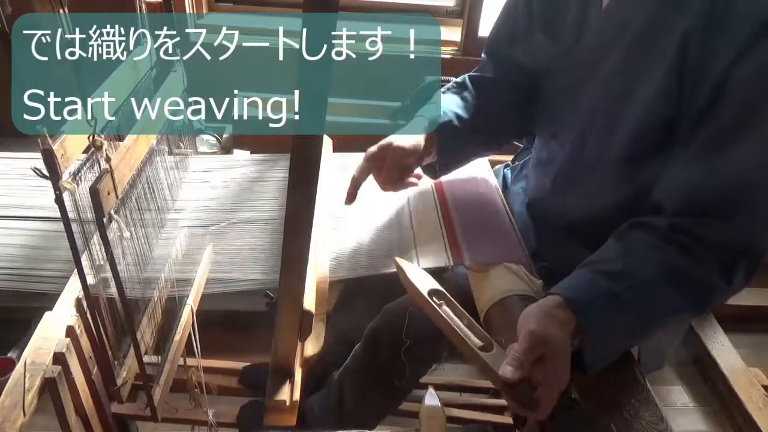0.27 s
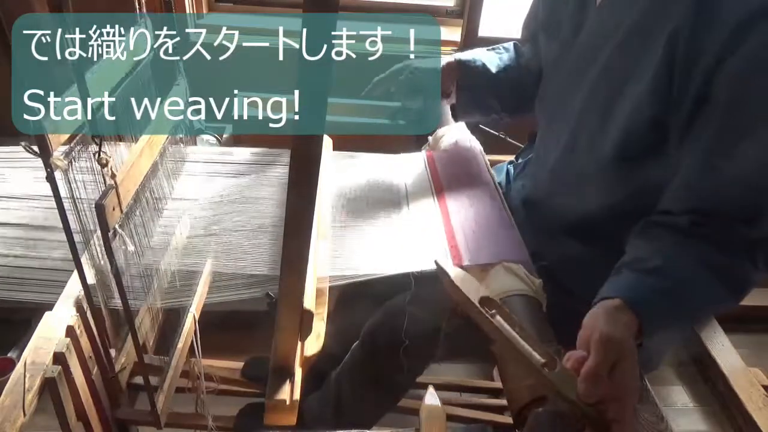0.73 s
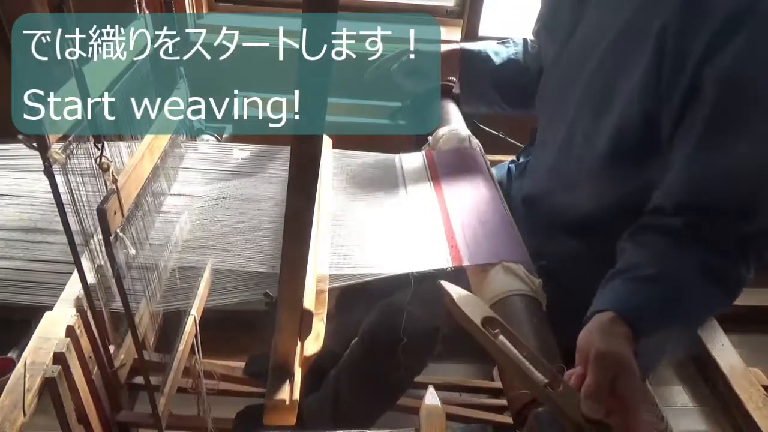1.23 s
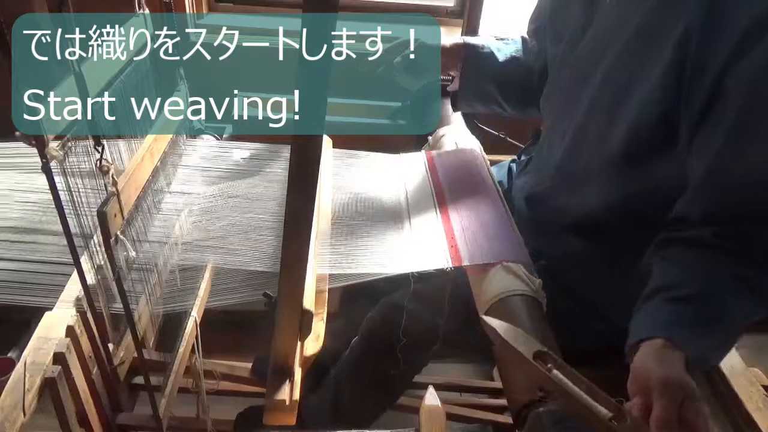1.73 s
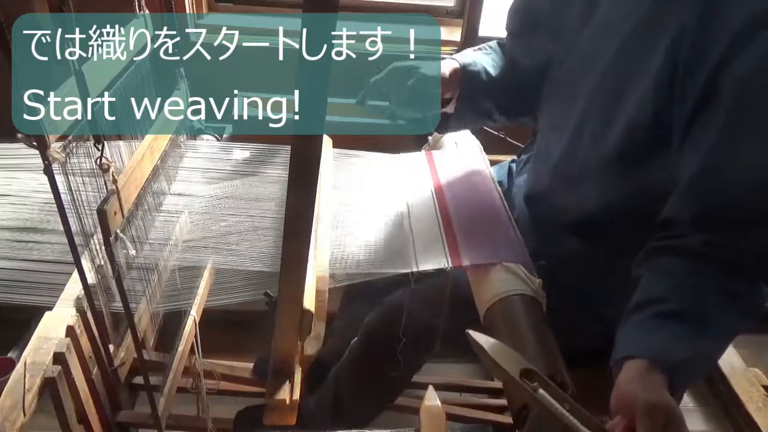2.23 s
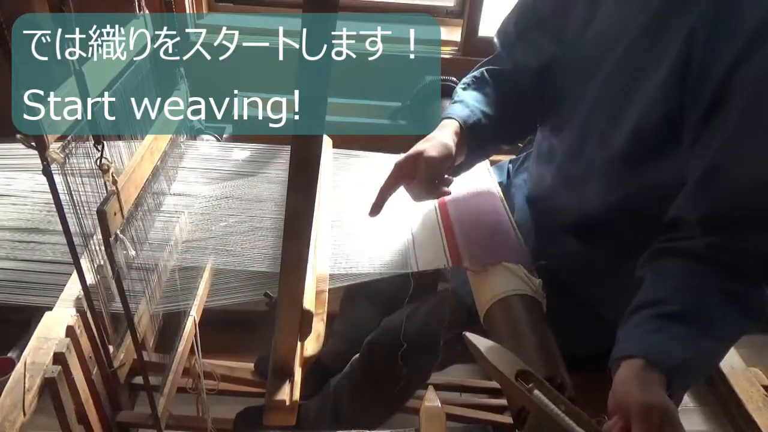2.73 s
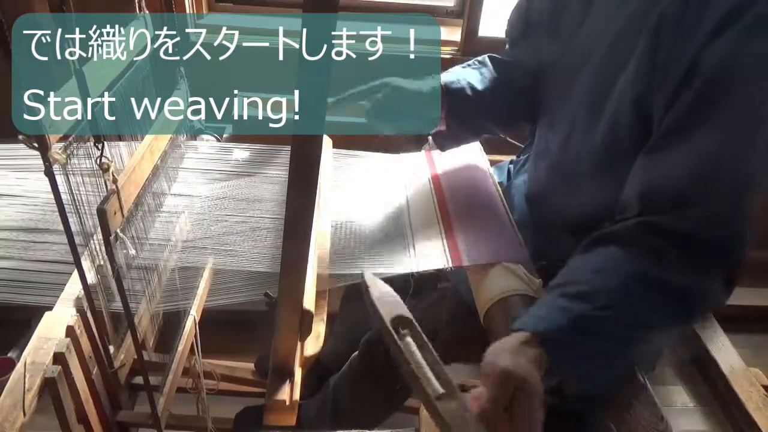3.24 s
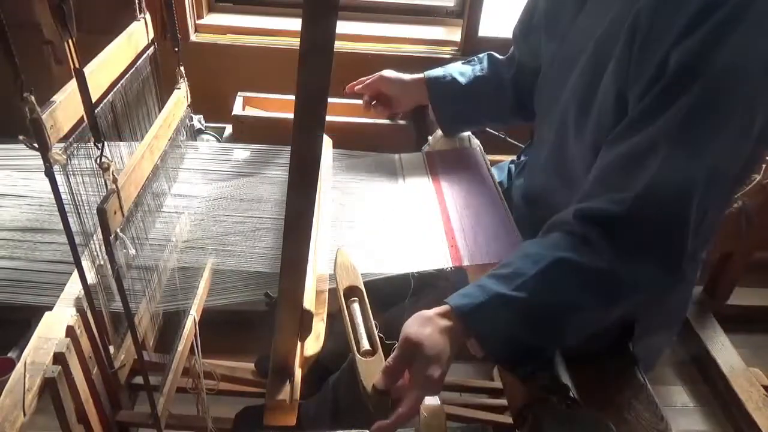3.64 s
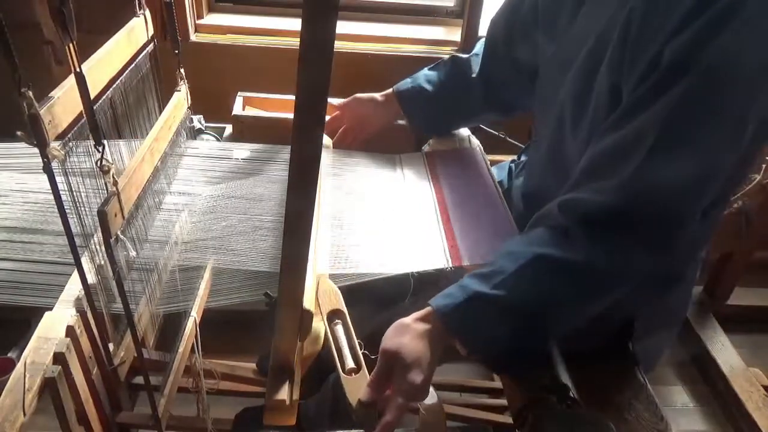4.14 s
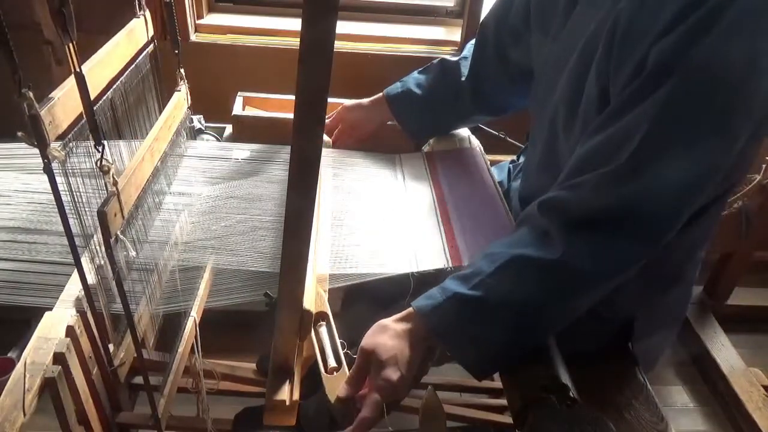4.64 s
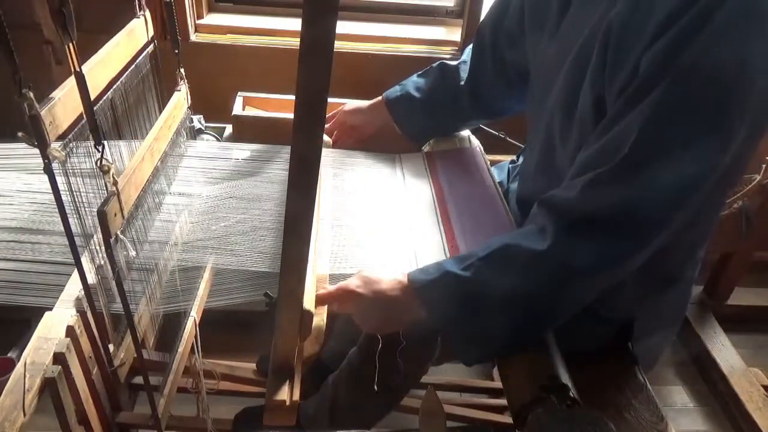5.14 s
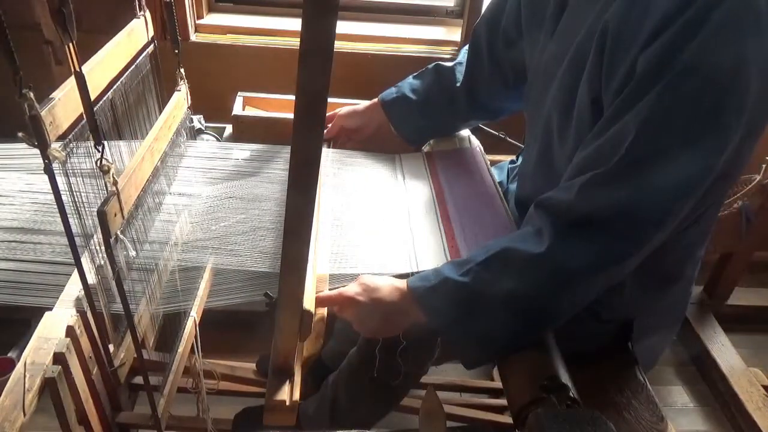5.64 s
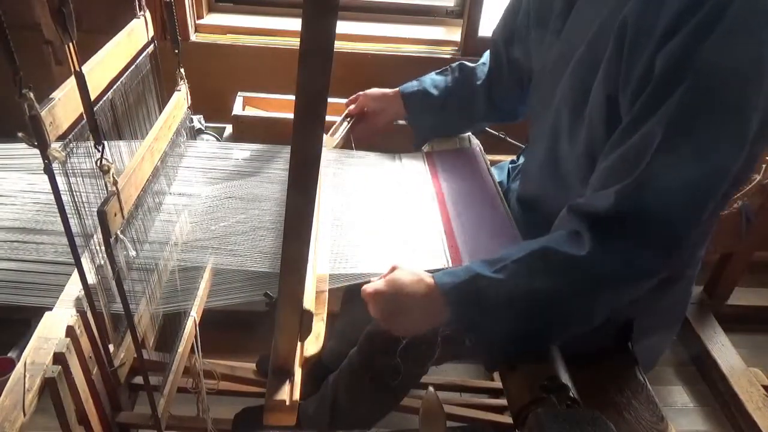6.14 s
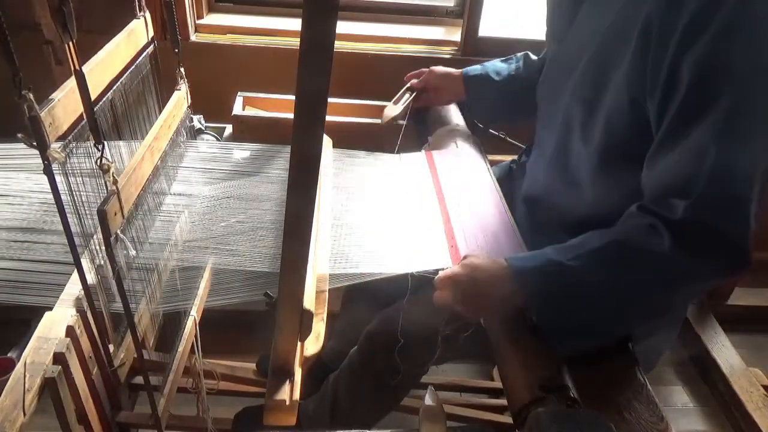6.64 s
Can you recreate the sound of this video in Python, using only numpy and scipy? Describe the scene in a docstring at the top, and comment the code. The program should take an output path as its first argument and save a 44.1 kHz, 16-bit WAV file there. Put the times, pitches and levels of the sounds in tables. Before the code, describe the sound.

Light clacks and even metallic ticking from a handloom, followed by a wooden shuttle thrown with a loud, clattering scrape.

```python
"""A wooden handloom in a small workshop. First a few clacks set its wires jangling. A loose steel fitting
swings and ticks evenly, and impacts excite the modes of frame and beam in knocks and thuds.
Then the boat shuttle clacks against the batten and is thrown along the reed, rattling and scraping by
friction. Last it is drawn out, its bobbin whirring and chattering, with a few more clacks.
Throughout, sleeves rustle over a low hum and hiss."""
import sys
import numpy as np
from scipy import signal
from scipy.fft import rfft, irfft, next_fast_len
from scipy.io import wavfile
from scipy.ndimage import map_coordinates

SR = 44100
rng = np.random.default_rng(int(sys.argv[2]) if len(sys.argv) > 2 else 0)


def wav_out(sig):
    """Save sig, one row per channel (or a flat mono array), as 16-bit PCM at SR to the path in sys.argv[1]."""
    wavfile.write(sys.argv[1], SR, np.round(np.clip(np.atleast_2d(sig).T, -1, 1) * 32767).astype(np.int16))


N = 303408
T = np.arange(int(SR * .6)) / SR  # time axis of one impact [s]


def shuttle():
    """Impact and sliding friction: the hollow shuttle clacks, rumbles on the batten, scrapes the reed."""
    # contacts of shuttle, reed and fittings: (time [s], level [dB], treble [dB])
    clacks = [(0.0268, -30, -10.5), (0.1978, -14.5, -5), (0.2039, -13.5, -9), (0.2168, -17.5, -19),
              (0.597, -23.5, -29), (4.433, -12.5, -23), (4.4412, -3, -17), (4.692, -53, -16),
              (4.892, -5.5, -29), (4.9031, -10, -20), (4.9139, -6, -9), (4.9568, -5, -14), (4.981, -8, -12),
              (5.004, -5.5, -8), (5.027, -3, -9), (5.0689, -6.5, -3), (5.1105, -7.5, -13),
              (5.1367, -3.5, -13.5), (5.209, -5, -19.5), (5.232, -13.5, -18), (5.2631, -6, -21),
              (6.0402, -15.5, -10.5), (6.0881, -20, -25), (6.1049, -22, -11.5), (6.135, -21.5, -36),
              (6.1596, -36.5, 0.5), (6.326, -26.5, -18)]
    # force on the reed as the shuttle is pushed in, flung and coasts: (time [s], level [dB])
    throw = [(4.85, -34.5), (4.9, -9), (4.95, -13.5), (5.045, -1.5), (5.14, -2), (5.185, -5.5),
             (5.325, -9.5), (5.42, -27)]
    # modes: (frequency [Hz], nominal bandwidth [Hz], level [dB])
    shuttle_modes = [(2875, 30, -6), (3050, 19, -23), (3380, 18, -7), (4040, 140, 7), (4900, 91, 4),
                     (5330, 160, 6.5), (6030, 330, 6), (6100, 100, -22), (7370, 36, -24), (7900, 50, -6)]
    batten_modes = [(165, 28, -18), (541, 34, 1.5), (795, 15, -13), (1090, 310, 11), (1380, 29, -10),
                    (1740, 46, -7)]
    reed_modes = [(2760, 50, -2), (3300, 30, -20), (4290, 100, 12.5), (4870, 310, -6), (5110, 210, 4.5),
                  (5730, 110, -16), (7100, 120, -20), (6950, 77, -19), (8300, 56, -6), (7750, 140, -13.5)]
    # excitation spectra: (frequency [Hz], level [dB])
    clack_tone = [(88, -45), (150, -27.5), (554, -25), (1230, -16), (1910, -7.5), (2160, -8), (2950, -0.5),
                  (4640, -4), (5660, -1), (7040, 2), (7850, -4), (10900, -10), (11500, -28), (15000, -57),
                  (22000, -120)]
    rumble_tone = [(70, -48), (120, -28), (165, -0.5), (250, -20.5), (360, -1.5), (450, -2.5), (530, 2.5),
                   (680, -8), (790, -5), (900, -8), (1100, 4.5), (1280, -16), (2000, -10), (3000, -44)]
    scrape_tone = [(1120, -40), (1900, -8), (2170, -9), (2860, 1.5), (3740, -3.5), (4990, -3.5), (5500, -8),
                   (7500, -9), (9750, -17), (16500, -120)]
    fizz_tone = [(3820, -30), (6500, -1.5), (9300, -11.5), (10900, -4), (11400, -33), (11500, -38),
                 (15000, -55), (22000, -120)]
    out = np.zeros((2, N))
    # the shuttle's weight lies on the batten
    ride = stroke(start_s=4.953, length_s=0.35, rise_db_per_s=217, drift_db_per_s=-6.5, fall_db_per_s=227)
    for s, db, treble_db in clacks:
        bass_db = -19.5 + 0.31 * (db + 11.5) + 8 * ride[round(s * SR)]  # more with force and on the batten
        x = blow(clack_tone, shuttle_modes, crack_t60=0.045, sustain=0.41, ring_db=-1.5, wet_db=-2,
                 contact_s=0.0011)
        add(out, s, amp(db - 19) * voiced(x, 1550, 6200, bass_db, treble_db + 8, swell_s=0.0009))
    start, end = throw[0][0], throw[-1][0]
    gate = stroke(start, end - start, rise_db_per_s=400, drift_db_per_s=0, fall_db_per_s=400)
    force = amp(curve(throw)) * gate
    rumble = ride * friction(rumble_tone, batten_modes, ring_db=-1.5, rate=460, grain_s=0.0037, spiky=0.52)
    scrape = force * friction(scrape_tone, reed_modes, ring_db=-8.5, rate=270, grain_s=0.0024, spiky=1.3)
    fizz = friction(fizz_tone, reed_modes, ring_db=2.5, rate=980, grain_s=0.00076, spiky=0.97)
    fizz *= force ** 2.28  # harder rubbing sounds brighter
    out += amp(-29) * rumble + amp(-20) * scrape + amp(-14.5) * fizz
    return out * amp([[.15], [-.15]])


def wires():
    """Beating of close modes: the wires jangle once, and the reed sings after the squarest hits."""
    # ringing bands: (frequency [Hz], bandwidth [Hz], level [dB], t60 [s])
    jangle = [(2360, 310, -33, 1), (3350, 210, -35, 0.89), (6290, 370, -21.5, 0.32),
              (9500, 3100, -27.5, 0.51)]
    # the shuttle's nose meets the reed: (time [s], level [dB], frequency [Hz], bandwidth [Hz])
    reed_hits = [(4.442, -23, 3300, 910), (5.232, -21, 2910, 450), (5.261, -26, 2980, 450),
                 (6.041, -35, 3070, 550)]
    out = np.zeros((2, N))
    add(out, .199, amp(-9.5) * shimmer(jangle))
    reed_t60 = 0.33
    for s, db, hz, width_hz in reed_hits:
        add(out, s, shimmer([(hz, width_hz, db, reed_t60)]))
    return out


def bobbin():
    """Friction and inelastic rebound: the bobbin whirs at each pull and jumps on its ringing spindle."""
    # pulls on the weft: (time [s], duration [s], level [dB])
    pulls = [(5.322, 0.17, -46), (5.774, 0.086, -46.5), (5.912, 0.086, -39.5)]
    # jumps on the spindle: (time [s], level [dB])
    jumps = [(5.295, -16), (5.4394, -19.5), (5.558, -31.5), (5.7754, -46), (5.9123, -26.5), (6.0035, -24)]
    # bobbin modes: (frequency [Hz], nominal bandwidth [Hz], level [dB])
    modes = [(524, 49, -10.5), (1705, 64, -0.5), (2020, 55, -2), (2950, 52, -24), (4187, 110, 4),
             (6660, 130, 3), (8700, 150, -5)]
    # excitation spectrum: (frequency [Hz], level [dB])
    tone = [(180, -49), (300, -15), (479, -2), (957, -24.5), (1940, 0.5), (2190, -7), (4130, -0.5),
            (5340, -3.5), (6790, -7.5), (11000, -17.5), (14300, -55), (22000, -120)]
    # ringing bands: (frequency [Hz], bandwidth [Hz], level [dB], t60 [s])
    spindle = [(1960, 90, -6, 0.24), (6790, 120, -4.5, 0.22)]
    rebound_s, rebound_loss_db = 0.016, 3.5
    spin = sum(amp(db) * stroke(s, length, rise_db_per_s=3000, drift_db_per_s=11, fall_db_per_s=302)
               for s, length, db in pulls)
    out = spin * friction(tone, modes, ring_db=-2.5, rate=210, grain_s=0.00065, spiky=0.5)
    for s, db in jumps:
        add(out, s, amp(db - 19) * shimmer(spindle))
        for k in range(3):
            x = blow(tone, modes, crack_t60=0.024, sustain=2.0, ring_db=4.5, wet_db=-5.5)
            add(out, s + k * rebound_s, amp(db - 21.5 - k * rebound_loss_db) * x / strength(x))
    return out


def frame():
    """Structural coupling: the frame knocks as the warp tightens and shakes the beam, which thuds."""
    # frame knocks: (time [s], level [dB], bass [dB], treble [dB], ring [dB])
    knocks = [(0.361, -14, -21, -17, -12), (1.7477, -10.5, -28.5, -14.5, 11), (1.756, -17.5, -21.5, -1, 15),
              (1.8382, -17, -19.5, -23, -10), (2.014, -27, -7.5, -1.5, -10), (2.9609, -21, -15.5, -28, -23),
              (4.6927, -35, -18.5, -3.5, -15)]
    # dull shifts of beam and treadles: (time [s], level [dB], boom [dB])
    thuds = [(0.768, -33, 2), (0.868, -26.5, -13.5), (0.902, -27.5, -20), (1.51, -33, -15),
             (1.534, -27.5, -4.5), (2.294, -33, -3.5), (2.404, -35.5, 1), (3.817, -35.5, -25),
             (3.94, -40, 1), (4.309, -36.5, -16), (5.887, -37.5, 3.5)]
    # the beam answers each knock with a thud, then a boom: (delay [s], level [dB], boom [dB])
    beam_response = [(.019, 4, 4.5), (.062, -11, 14)]
    # modes: (frequency [Hz], nominal bandwidth [Hz], level [dB])
    frame_modes = [(1350, 53, -8.5), (1890, 190, -1), (2080, 73, 6.5), (2370, 190, -17), (2635, 100, 0.5),
                   (3390, 110, -1), (4030, 33, -13), (4630, 53, -14), (6300, 54, -21)]
    beam_modes = [(172.2, 18.4, 4), (200, 7.9, -6.5), (240, 43, -1), (427.4, 28, 6), (604, 29, -8),
                  (723, 81, -4.5)]
    # excitation spectra: (frequency [Hz], level [dB])
    knock_tone = [(70, -45), (120, -30), (170, -4), (240, -5.5), (400, -21), (540, -6), (720, -10.5),
                  (1000, -7), (1500, -1.5), (2170, -2.5), (3000, -5), (5700, -4.5), (10600, -17),
                  (12000, -32)]
    thud_tone = [(65, -33), (110, -16), (163, -20), (330, 0), (434, -2), (602, -6.5), (823, -11.5),
                 (963, -19.5), (2500, -19), (3250, -16), (5500, -120)]
    out = np.zeros((2, N))
    for s, db, bass_db, treble_db, ring_db in knocks:
        x = blow(knock_tone, frame_modes, crack_t60=0.033, sustain=0.79, ring_db=ring_db, wet_db=-3.5,
                 contact_s=0.0021)
        add(out, s, amp(db - 14.5) * voiced(x, 870, 2930, bass_db + 14.5, treble_db + 5, swell_s=0.012))
    shakes = [(s + delay, db + bass_db + shake_db, boom_db)
              for s, db, bass_db, *_ in knocks for delay, shake_db, boom_db in beam_response]
    for s, db, boom_db in list(thuds) + shakes:
        x = blow(thud_tone, beam_modes, crack_t60=0.11, sustain=1.48, ring_db=-2.5, wet_db=-8.5,
                 contact_s=0.0014)
        add(out, s, amp(db - 13) * voiced(x, 257, 1700, boom_db + 2, treble_db=-20.5, swell_s=0.0049))
    high_passed = filtered(out, lambda hz: 1 - 1 / (1 + (hz / 125) ** 8))
    return high_passed * amp([[.8], [-.8]])  # slightly to the left


def loose_fitting():
    """Free vibration: a loose steel fitting swings and ticks evenly; lighter ticks ring more freely."""
    # about 5.6 ticks a second, at first often doubled: (time [s], level [dB])
    ticks = [(0.5267, -27.5), (0.718, -28), (0.7462, -23), (0.8983, -26), (0.9273, -24.5), (1.0819, -32),
             (1.1159, -31), (1.253, -32.5), (1.4185, -29.5), (1.4653, -32), (1.6087, -38), (1.986, -29),
             (2.1804, -27.5), (2.3488, -25.5), (2.5257, -27.5), (2.6934, -27), (2.8774, -30.5),
             (3.053, -31), (3.2355, -35.5), (3.4047, -35.5), (3.5713, -34.5)]
    # modes of the fitting: (frequency [Hz], nominal bandwidth [Hz], level [dB])
    modes = [(3520, 54, -2.5), (3554, 45, -2.5), (4404, 65, 0.5), (5776, 120, 1), (6400, 150, 4),
             (7820, 140, 2.5), (8960, 190, -0.5), (9740, 140, 2), (10520, 54, 2.5), (10800, 140, -1.5)]
    # excitation spectrum: (frequency [Hz], level [dB])
    tone = [(1200, -13), (2500, 3.5), (4000, -7), (6000, 14), (11000, -5)]
    usual_tick_db = -28.5
    out = np.zeros((2, N))
    for s, db in ticks:
        ring_db = 2.5 - 0.64 * (db - usual_tick_db)
        x = blow(tone, modes, crack_t60=0.044, sustain=2.4, ring_db=ring_db, wet_db=-1.5,
                 contact_s=0.00058)
        add(out, s, amp(db - 15.5) * x / strength(x))
    return out


def background():
    """Incoherent noises add in power: sleeves rustle over air and hiss, with rumble and a wavering hum."""
    # envelope of rumble and hum: (time [s], level [dB])
    low_levels = [(0.0, -63), (2.66, -60.5), (2.95, -58.5), (6.15, -69.5), (6.88, -69)]
    # hum partials: (frequency [Hz], level [dB])
    partials = [(85.5, 3), (167, -11)]
    # sleeves brush the cloth: (centre time [s], duration [s], level [dB])
    sleeves = [(0.264, 0.36, -43), (0.792, 0.49, -52), (1.566, 0.28, -53), (2.187, 0.8, -52),
               (3.1, 0.52, -54.5), (3.81, 0.83, -52), (4.364, .35, -53.5), (5.947, 0.26, -46.5),
               (6.336, 0.46, -50.5), (6.67, 1, -54)]
    # noise spectra: (frequency [Hz], level [dB])
    low_tone = [(12, -44), (22, -14), (52, -4.5), (70, -10), (86, 0), (110, -5), (150, -24), (250, -53)]
    air_tone = [(90, -15), (125, 1.5), (165, 7.5), (240, 2), (380, 0.5), (520, -2.5), (800, -2), (4000, -9),
                (5200, -38), (8800, -120)]
    hiss_tone = [(1880, -25), (3200, -6.5), (4940, 1), (5610, 1), (10600, -3), (11100, -4), (11300, -66),
                 (15000, -120)]
    t = np.arange(N) / SR
    bed = lambda tone, side_db: spread(noise(tone, N), noise(tone, N), side_db)
    hum = sum(amp(db + 2 * wobble(6.2)) * np.sin(2 * np.pi * hz * t + 0.52 * wobble(11))
              for hz, db in partials)
    rumble = amp(curve(low_levels) + 0.5) * (hum + amp(-0.5) * bed(low_tone, side_db=-15.5))
    rustle = np.sqrt(sum(amp(db) ** 2 * np.exp(-2 * np.pi * ((t - s) / length) ** 2)
                         for s, length, db in sleeves))
    air = np.hypot(amp(-55.5), amp(-5.5) * rustle) * bed(air_tone, side_db=-14)
    hiss = np.hypot(amp(-60.5), rustle) * bed(hiss_tone, side_db=-14)
    return rumble + air + hiss


def room(wet_db, build_s=0.0012):
    """Reverberation: an impulse response of direct sound and a diffuse tail, longest in the bass."""
    # the workshop's tail: (frequency [Hz], t60 [s], level [dB])
    decay = [(99, 0.29, 14), (198, 1, 3), (450, 0.25, 11.5), (850, 0.5, 3.5), (2140, 0.33, 3),
             (6000, 0.3, 0.5), (11100, 0.21, -1)]
    # its stereo width: (frequency [Hz], side level [dB])
    width = [(200, -16), (900, -19), (2200, -20), (4500, -20.5), (8000, -8.5)]
    hz, t, spectra = signal.stft(rng.standard_normal((2, len(T))), SR, nperseg=256)
    t60, db = (along(np.array(decay)[:, [0, k]], hz)[:, None] for k in (1, 2))
    spectra[1] *= amp(along(width, hz))[:, None]
    tail = signal.istft(spectra * amp(db - 60 * t / t60), SR, nperseg=256)[1][:, :len(T)]
    tail *= 1 - np.exp(-T / build_s)
    response = amp(wet_db) * spread(*tail, side_db=0) / np.linalg.norm(tail[0])
    response[:, 0] += 1  # direct sound
    return response


def blow(tone, modes, crack_t60, sustain, ring_db, wet_db, contact_s=0.00088):
    """Impact excitation: a short crack and the body's ring, heard through the room."""
    crack = noise(tone, len(T)) * amp(-60 * T / crack_t60)
    dry = crack / np.linalg.norm(crack) + amp(ring_db) * ring(modes, sustain)
    dry *= 1 - np.exp(-T / contact_s)  # a brief fade-in softens the attack of each hit
    return signal.fftconvolve(dry[None], room(wet_db), axes=1)[:, :len(T)]


def friction(tone, modes, ring_db, rate, grain_s, spiky):
    """Shot noise: tiny random impacts, rate a second, drive a resonant body in the room; rms 1."""
    impacts = (rng.random(N) < rate / SR) * np.exp(spiky * rng.standard_normal(N).clip(-2, 2))
    contact = np.sqrt(signal.lfilter([1], [1, -np.exp(-1 / (grain_s * SR))], impacts) + 1e-12)
    grains = unit(filtered(rng.standard_normal(N) * contact, lambda hz: amp(along(tone, hz))))
    resonance = unit(signal.fftconvolve(grains, ring(modes, sustain=0.58))[:N])
    dry = grains + amp(ring_db) * resonance
    return unit(signal.fftconvolve(dry[None], room(wet_db=0), axes=1)[:, :N])


def ring(modes, sustain):
    """Modal superposition: damped sines of random strength, energy 1; sustain divides each bandwidth."""
    hz, width, db = np.transpose(modes)[:, :, None]
    scatter, polarity = rng.standard_normal((2, len(modes), 1))
    gain = amp(db + 2 * scatter) * np.sqrt(width) * np.sign(polarity)
    x = np.sum(gain * np.exp(-np.pi * width * T / sustain) * np.sin(2 * np.pi * hz * T), 0)
    return x / np.linalg.norm(x)


def shimmer(bands, attack_s=0.00076):
    """Beating: decaying bands of noise shimmer like many nearly equal tones."""
    out = np.zeros((2, len(T)))
    for centre_hz, width_hz, db, t60 in bands:
        white = rng.standard_normal((2, len(T)))
        band = filtered(white, lambda hz: 1 / (1 + (2 * (hz - centre_hz) / width_hz) ** 4))
        x = spread(*band, side_db=-21) * amp(-60 * T / t60) * (1 - np.exp(-T / attack_s))
        out += amp(db) * x / strength(x)
    return out


def voiced(x, low_hz, high_hz, bass_db, treble_db, swell_s):
    """Spectral balance: place and hardness of a contact set its bass and treble against its middle."""
    low, below_treble = (signal.sosfiltfilt(signal.butter(3, hz, fs=SR, output="sos"), x, padtype=None)
                         for hz in (low_hz, high_hz))
    low = low * (1 - np.exp(-T / swell_s))  # inertia: heavy parts take longer to get moving
    bands = [(bass_db, low), (0, below_treble - low), (treble_db, x - below_treble)]
    return sum(amp(db) * band / strength(band) for db, band in bands)


def stroke(start_s, length_s, rise_db_per_s, drift_db_per_s, fall_db_per_s):
    """Exponential envelope of a movement: it builds up to its start, drifts, then dies away."""
    t = np.arange(N) / SR - start_s
    return amp(rise_db_per_s * np.minimum(t, 0) + drift_db_per_s * np.clip(t, 0, length_s)
               - fall_db_per_s * np.maximum(t - length_s, 0))


def amp(db):
    """Decibels to gain."""
    return 10 ** (np.asarray(db) / 20)


def unit(x):
    """Scaled to rms 1."""
    return x / np.sqrt(np.mean(x ** 2) + 1e-20)


def strength(x):
    """The rms of a blow's first 40 ms."""
    return np.sqrt(np.mean(x[:, :SR // 25] ** 2) + 1e-20)


def along(points, hz):
    """(frequency, value) points read on a log axis."""
    frequencies, values = np.transpose(points)
    return np.interp(np.log(hz + 1), np.log(frequencies + 1), values)


def curve(points):
    """(time, value) points read at every sample."""
    return np.interp(np.arange(N) / SR, *np.transpose(points))


def wobble(rate):
    """A smooth random curve, rate knots a second."""
    return map_coordinates(rng.standard_normal(int(N * rate / SR) + 4), [np.arange(N) * rate / SR])


def filtered(x, response):
    """Linear filtering: the spectrum of x times a frequency response."""
    n = x.shape[-1]
    padded = next_fast_len(n + 8192)
    return irfft(rfft(x, padded) * response(np.fft.rfftfreq(padded, 1 / SR)), padded)[..., :n]


def noise(tone, size):
    """Coloured noise of rms 1."""
    return unit(filtered(rng.standard_normal(size), lambda hz: amp(along(tone, hz))))


def spread(mid, side, side_db):
    """Mid and side to left and right."""
    return np.array([mid + amp(side_db) * side, mid - amp(side_db) * side])


def add(track, s, x):
    """Lay a sound into the track at time s."""
    part = track[:, round(s * SR):][:, :x.shape[-1]]
    part += x[:, :part.shape[-1]]


def scene():
    """Superposition of the loom's sources and the background."""
    return frame() + loose_fitting() + shuttle() + wires() + bobbin() + background()


def record(dry):
    """Soft saturation rounds the highest peaks; a steep low-pass limits the band."""
    ceiling, cutoff_hz = .75, 11250
    rounded = dry / (1 + np.abs(dry / ceiling) ** 6) ** (1 / 6)
    return filtered(rounded, lambda hz: 1 / np.sqrt(1 + (hz / cutoff_hz) ** 160))


dry = scene()
out = record(dry)
wav_out(out)
```